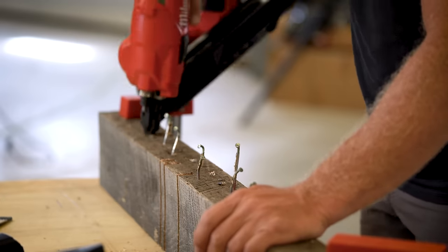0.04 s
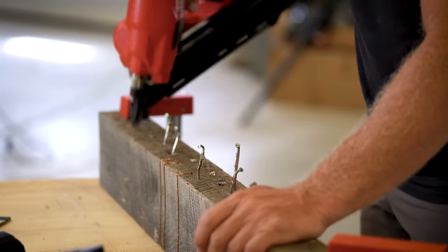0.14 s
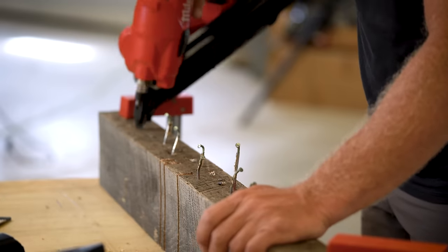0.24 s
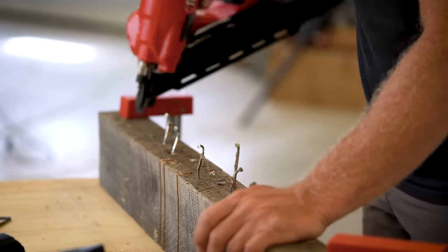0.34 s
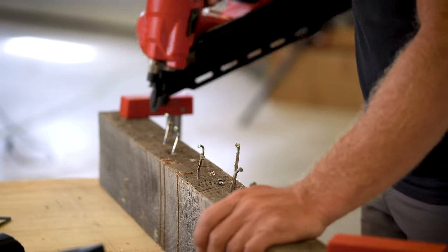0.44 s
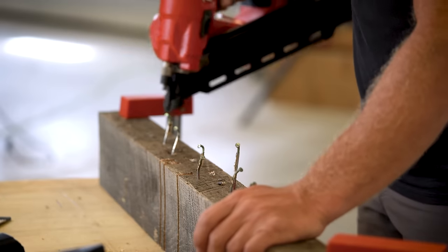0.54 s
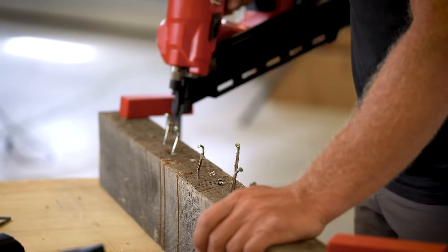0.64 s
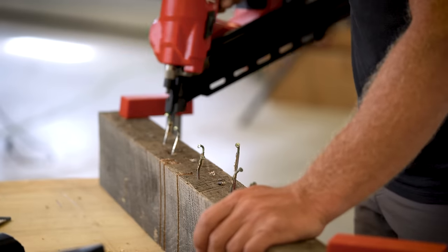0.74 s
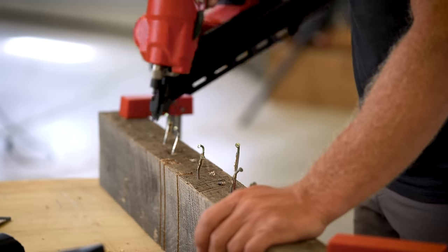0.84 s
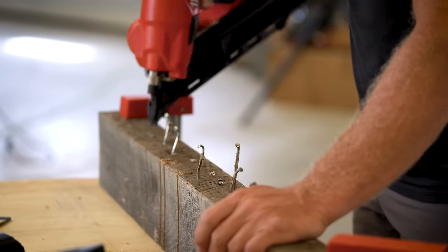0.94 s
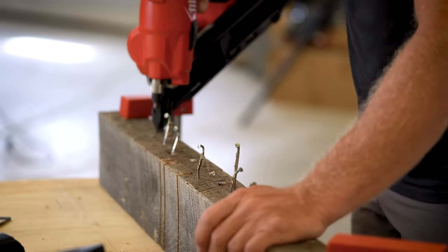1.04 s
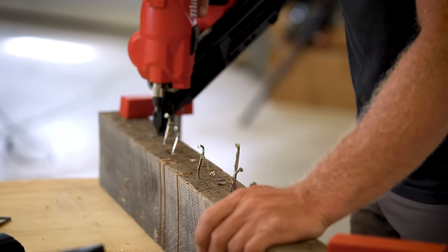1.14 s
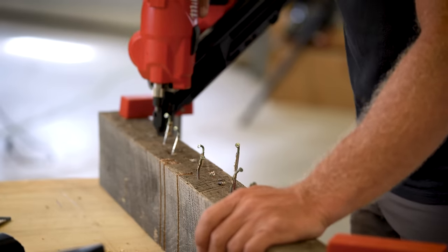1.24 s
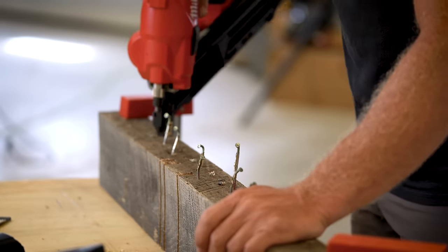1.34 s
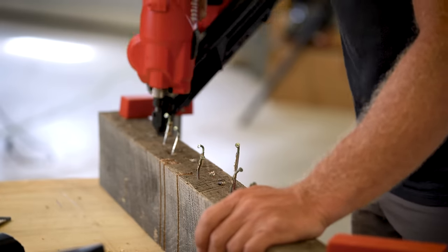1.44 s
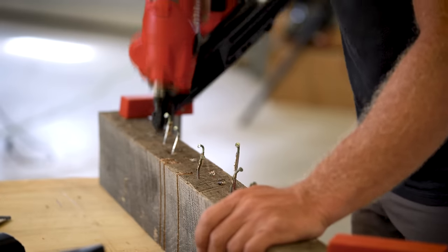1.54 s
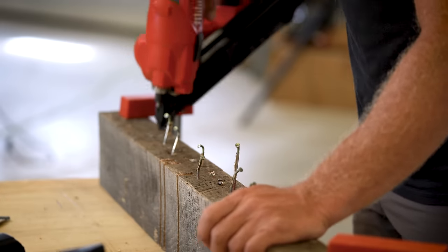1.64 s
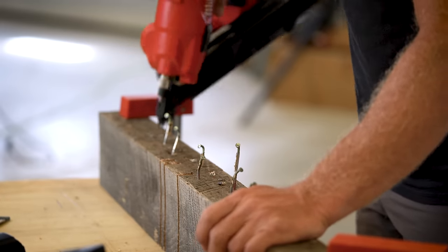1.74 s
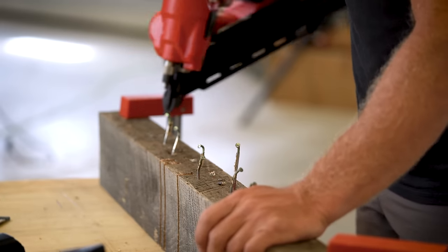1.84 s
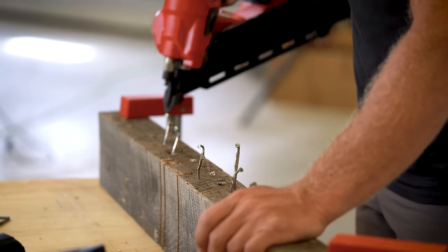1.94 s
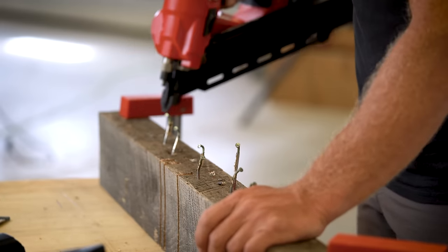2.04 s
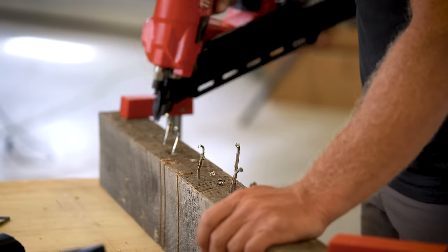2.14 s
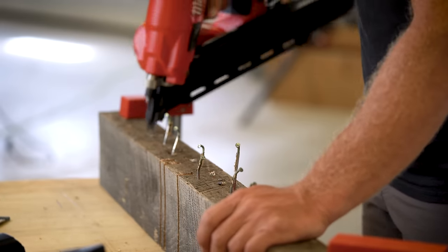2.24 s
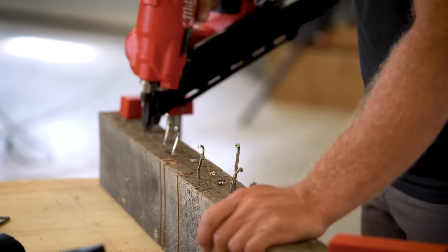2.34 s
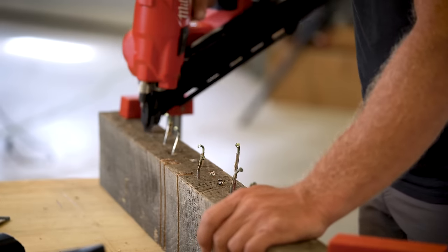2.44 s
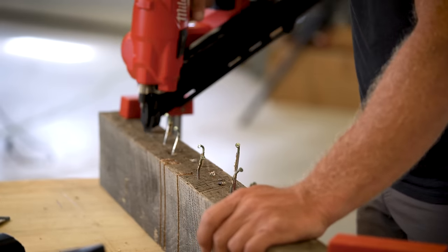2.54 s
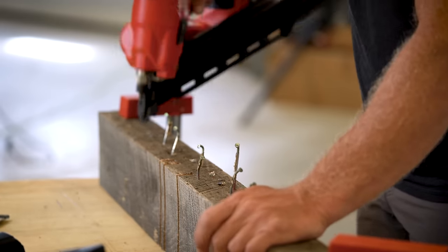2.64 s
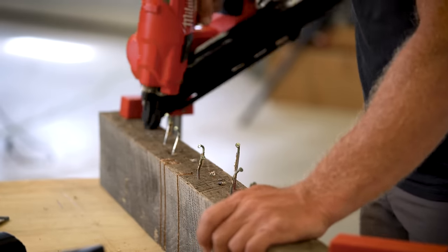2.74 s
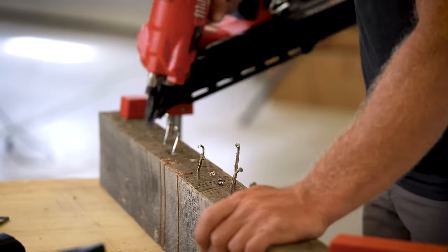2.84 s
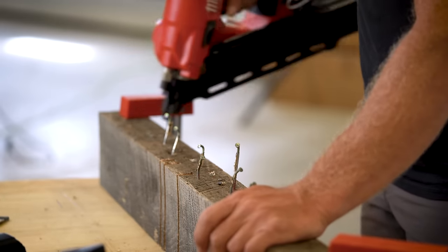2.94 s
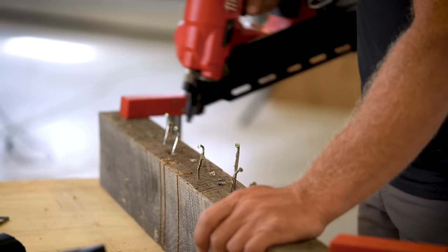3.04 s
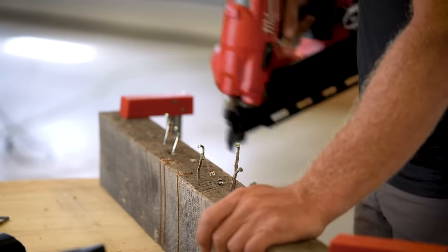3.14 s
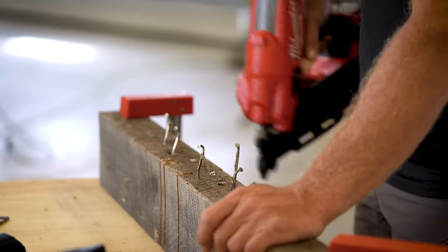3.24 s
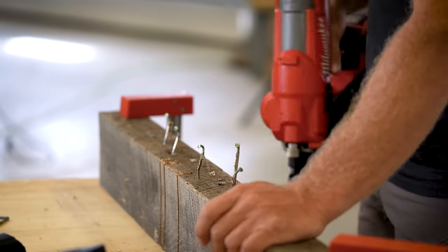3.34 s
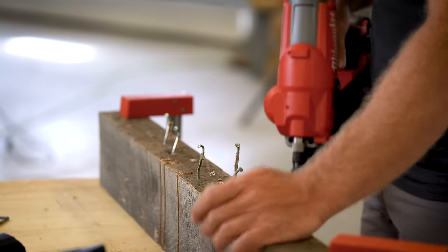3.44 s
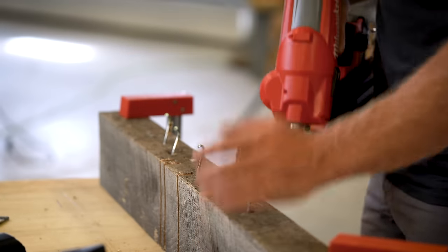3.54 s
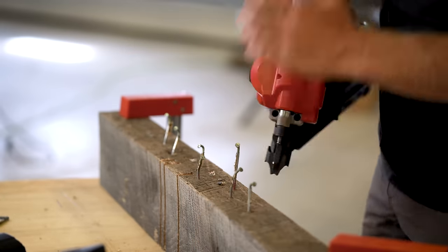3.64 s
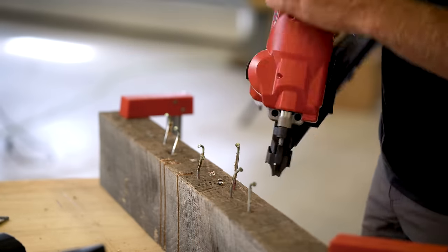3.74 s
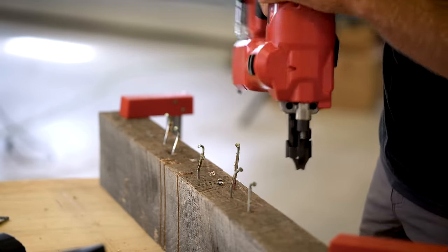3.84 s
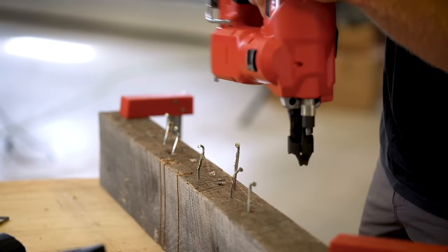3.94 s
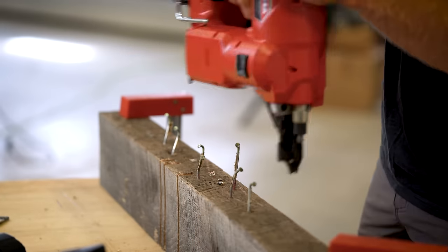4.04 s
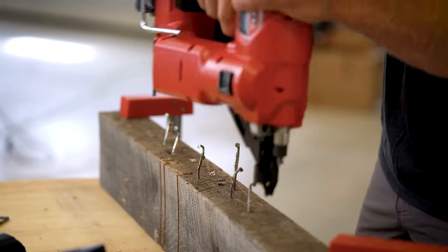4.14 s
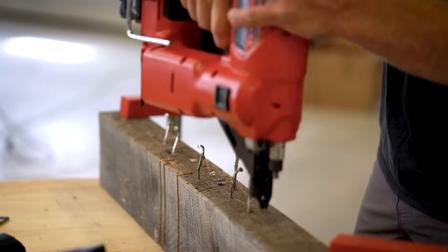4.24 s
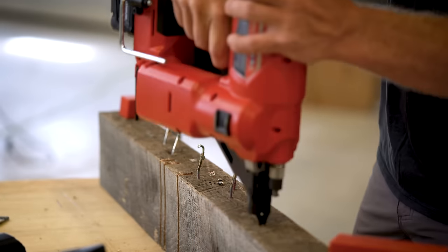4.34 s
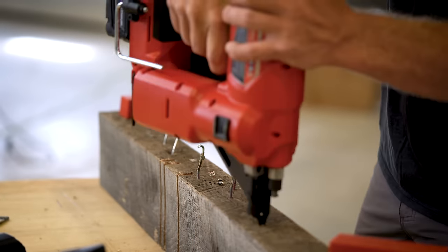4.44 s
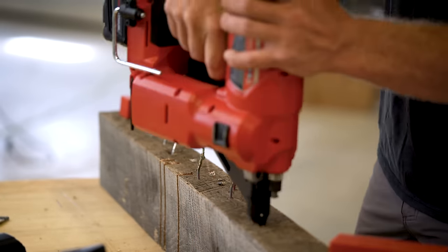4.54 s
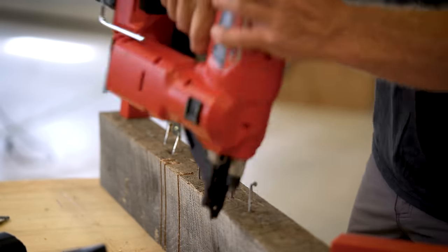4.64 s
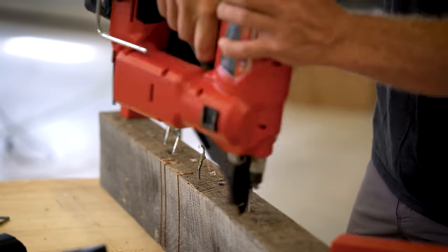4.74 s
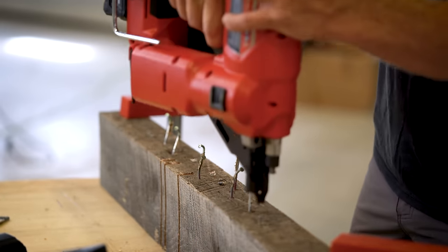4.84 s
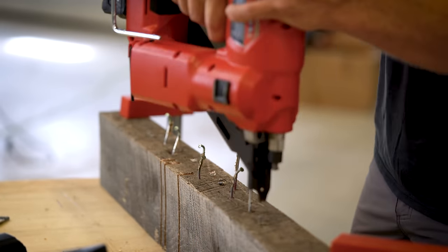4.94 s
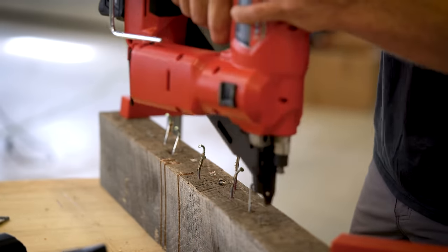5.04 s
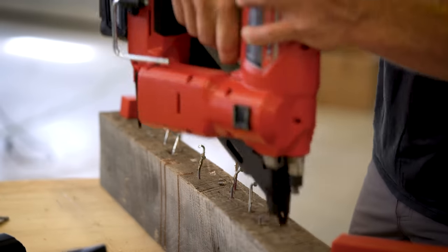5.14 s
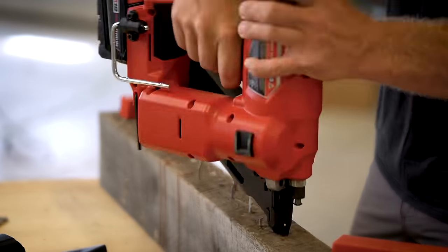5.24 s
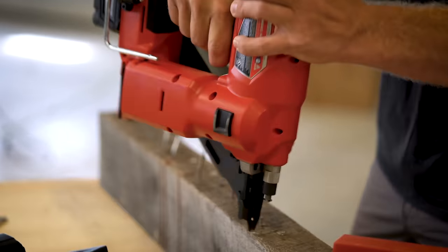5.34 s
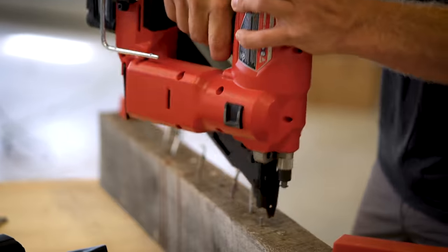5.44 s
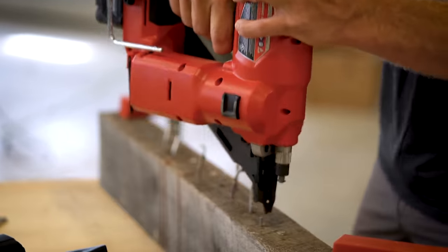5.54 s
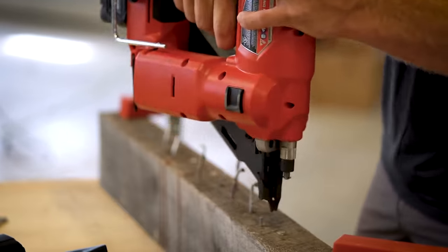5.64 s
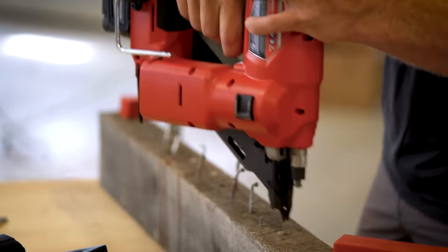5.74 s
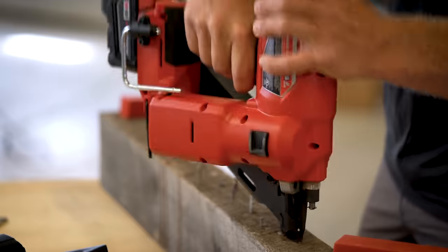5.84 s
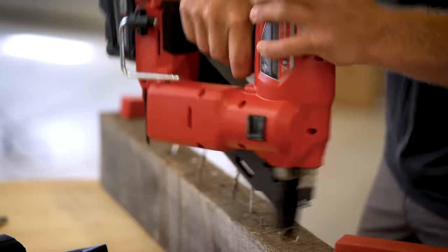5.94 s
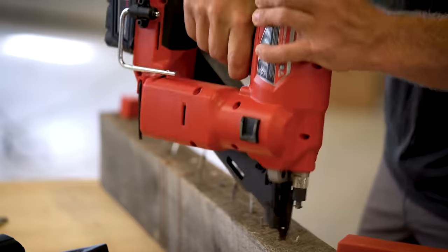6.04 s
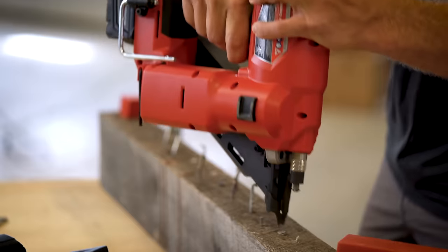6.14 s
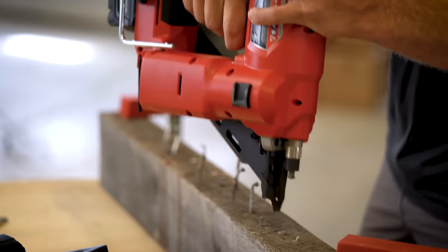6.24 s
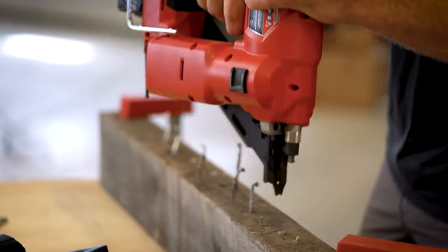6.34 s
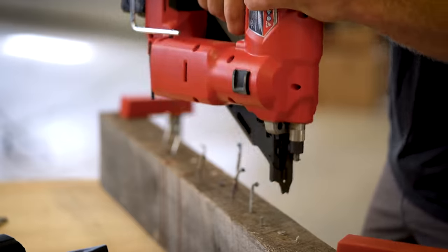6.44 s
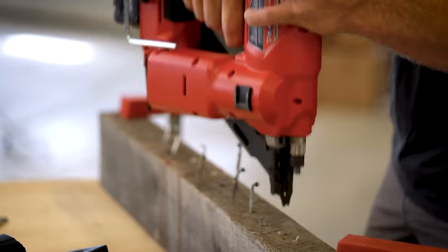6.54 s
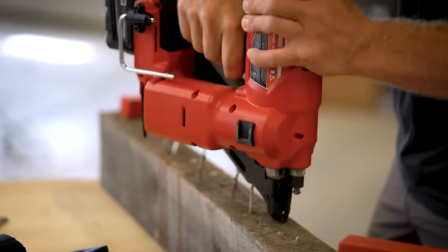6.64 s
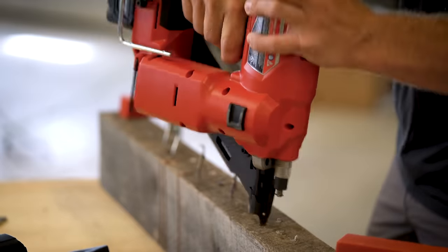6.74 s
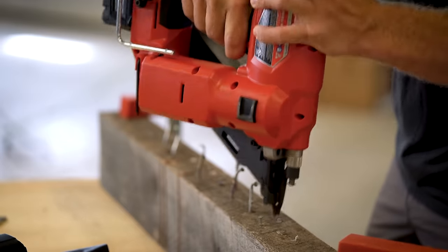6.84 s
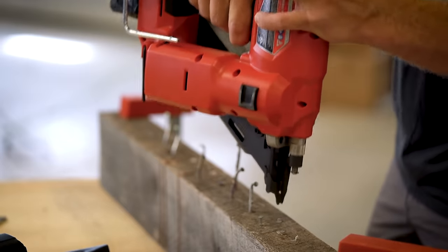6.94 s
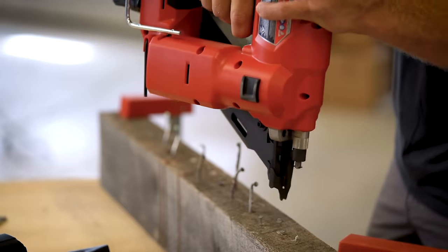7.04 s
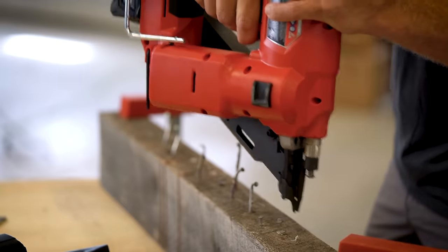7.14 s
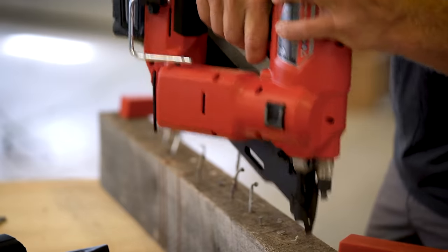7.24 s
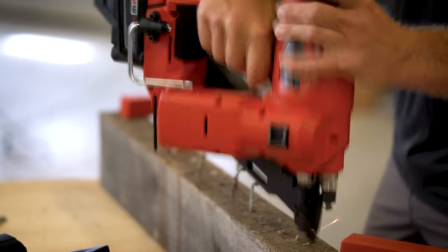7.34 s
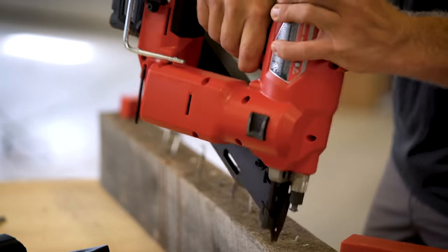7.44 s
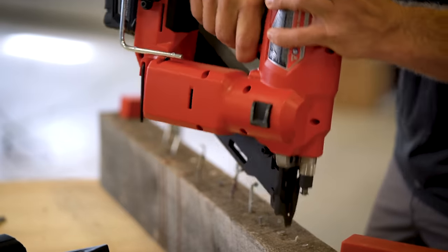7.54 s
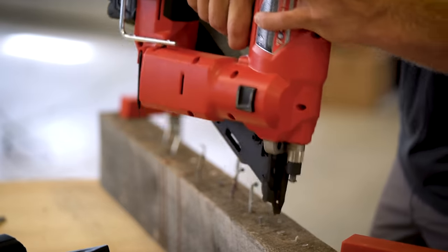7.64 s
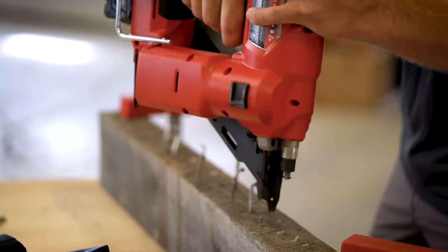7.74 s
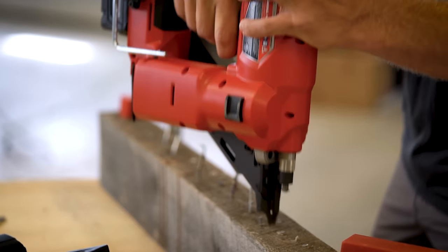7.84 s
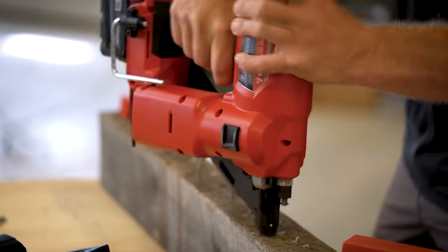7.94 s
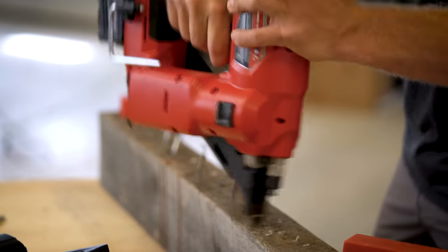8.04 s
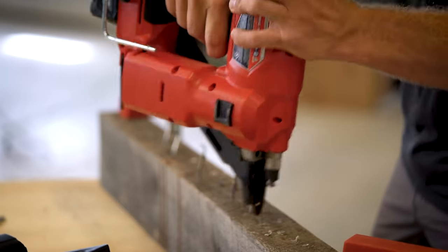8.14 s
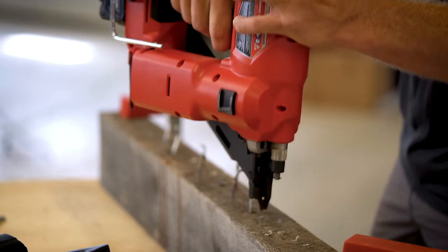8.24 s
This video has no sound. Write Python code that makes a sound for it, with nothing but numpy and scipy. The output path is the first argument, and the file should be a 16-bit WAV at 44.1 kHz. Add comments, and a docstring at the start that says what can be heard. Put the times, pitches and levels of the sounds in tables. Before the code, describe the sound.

Nine nail gun shots crack and thud into dense wood, three spaced apart, then six faster, with clicks and short ratcheting whirs.

```python
"""Cordless nailer in a workshop

A cordless framing nailer drives nine nails into a dense beam clamped to a bench in a large, echoing room.
Each time the nose clicks down, the motor spins up, a steel driver cracks the nail in and the tool bounces.
The geared motor then winds the driver back against a gas spring, tooth by tooth.
The shots are loud enough to overload the microphone."""
import sys
import numpy as np
from scipy import signal
from scipy.io import wavfile

SR = 44100
rng = np.random.default_rng(int(sys.argv[2]) if len(sys.argv) > 2 else 0)


def dump_mix(stems):
    """Bounce the given channels to the path in sys.argv[1] as a 16-bit WAV at rate SR."""
    frames = np.atleast_2d(stems).T  # one column per channel
    limited = np.clip(frames, -1, 1)  # hard clip at full scale
    pcm = np.round(limited * 32767).astype(np.int16)
    wavfile.write(sys.argv[1], SR, pcm)


N = 366030
TIME = np.arange(N) / SR
EDGES_HZ = np.geomspace(22, 17500, 33)
BANDS_HZ = np.sqrt(EDGES_HZ[1:] * EDGES_HZ[:-1])


def from_db(db):
    """Turn decibels into a gain."""
    return 10 ** (np.asarray(db) / 20)

def fade_per_sample(fade_s):
    """The gain per sample that makes a sound fall by 60 dB in fade_s."""
    return from_db(-60 / (fade_s * SR))

def at_hz(table, hz):
    """Look up a table's value at any pitch."""
    known_hz, values = np.transpose(table)
    return np.interp(np.log(hz), np.log(known_hz), values)

def band_pass(sound, band):
    """Keep one band of a sound, about a third of an octave wide."""
    sos = signal.butter(2, EDGES_HZ[band:band + 2], "band", fs=SR, output="sos")
    return signal.sosfilt(sos, sound)

def noise_bands():
    """Equally strong bands of noise, from bass to treble."""
    white = rng.standard_normal((2, N))
    bands = (band_pass(white[k % 2], k) for k in range(len(BANDS_HZ)))
    return np.array([band / band.std() for band in bands], dtype=np.float32)

def band_gains(colour):
    """Turn a tone colour (level per hertz at each pitch) into band gains with a total power of 1."""
    gains = from_db(at_hz(colour, BANDS_HZ)) * np.sqrt(np.diff(EDGES_HZ))
    return (gains / np.linalg.norm(gains)).astype(np.float32)

def flutter(per_s):
    """A random wobble, roughly 1 in size."""
    points = rng.standard_normal(N // 10)
    return np.interp(TIME * per_s, np.arange(len(points)), points)

def impulses(times_s, levels_db):
    """One click for each contact."""
    out = np.zeros(N)
    at = np.round(np.asarray(times_s) * SR).astype(int)
    np.add.at(out, at[at < N], from_db(levels_db)[at < N])
    return out

def strike(noise, clicks, colour, fade_s, contact_s):
    """A knock with no clear note: energy builds during the contact, then dies away."""
    contact = np.clip(contact_s * SR - np.arange(SR // 40), 0, 1)
    energy = signal.oaconvolve(clicks ** 2, contact / contact.sum())[:N].clip(1e-18)
    def envelope(seconds):
        return np.sqrt(signal.lfilter([1], [1, -fade_per_sample(seconds) ** 2], energy))
    gains = band_gains(colour)
    if np.ndim(fade_s) == 0:
        return (gains @ noise) * envelope(fade_s)
    return sum(gain * band * envelope(seconds) for gain, band, seconds in zip(gains, noise, fade_s))

def ring(notes, times_s, levels_db, scatter_db):
    """Every blow sets an object's own notes ringing, each with a slightly random strength."""
    out = np.zeros(N)
    for k, (hz, note_db, fade_s) in enumerate(notes):
        keep, angle = fade_per_sample(fade_s), 2 * np.pi * hz / SR
        clicks = impulses(times_s, levels_db + note_db + scatter_db * rng.standard_normal(len(times_s)))
        feedback = [1, -2 * keep * np.cos(angle), keep ** 2]
        out += (-1) ** k * signal.lfilter([0, np.sin(angle)], feedback, clicks + 1e-18)
    return out


# Tone colour of the background: pitch_hz, level_db
BACKGROUND_COLOUR = [(15, -29), (25, 4), (59, 2), (103, -7), (344, -7.5), (2020, -28), (5280, -30.5),
                     (13800, -33.5), (15000, -43.5)]

def background(noise, level_db=-69.5):
    """A faint, steady rumble fills the room."""
    return from_db(level_db) * (band_gains(BACKGROUND_COLOUR) @ noise)

# Tone colours of struck steel and of the plastic housing: pitch_hz, level_db
STEEL_COLOUR = [(200, -9), (1000, -5), (2500, -3), (3300, -5), (4200, 2), (5200, 1), (6300, -0.5),
                (7600, -3), (10000, -1), (12500, -10.5), (15500, -12.5)]
HOUSING_COLOUR = [(60, -17), (250, -10.5), (550, -7), (800, -1.5), (1100, -3), (1550, 3.5), (2000, -9),
                  (2600, -5.5), (3500, -12), (8000, -20.5), (15500, -29.5)]
# Notes of the tool's shell and nail magazine: pitch_hz, level_db, fade_s
SHELL_NOTES = [(770, -8, .04), (1200, -6, .04), (1500, -6, .04), (1732, -8, .045), (2490, -9, .035),
               (4970, -11, .03)]

def small_parts(steel, wood, contacts):
    """Small steel parts snap home and knock on the plastic housing, which rings briefly."""
    start_s, steel_db, housing_db = np.transpose(contacts)
    snap = strike(steel, impulses(start_s, steel_db + 3.3), STEEL_COLOUR, fade_s=.025, contact_s=.0022)
    knocks = impulses(start_s, housing_db - 2.5)
    housing = strike(wood, knocks, HOUSING_COLOUR, fade_s=.055, contact_s=.002)
    return snap + housing + ring(SHELL_NOTES, start_s, housing_db - 1, scatter_db=2)

# The nose is set on the wood: start_s, steel_db, housing_db
NOSE_TOUCHES = [(.027, -24, -25), (1.1095, -37.5, -28.5), (1.133, -38, -28.5), (2.3181, -34, -25.5),
                (4.4065, -25, -29), (5.2432, -24, -25), (5.882, -26, -24), (6.6424, -22.5, -21),
                (7.3268, -23.5, -28), (7.961, -23, -24)]
# The nose is pressed home, which starts the motor: start_s, steel_db, housing_db, bump_db
NOSE_PRESSES = [(.061, -21, -27, -32), (1.5068, -23.5, -28, -30.5), (2.6205, -23, -28.5, -30.5),
                (4.551, -18, -33, -37), (5.2647, -16.5, -23, -23), (5.903, -18, -29, -21),
                (6.6605, -14.5, -18, -23.5), (7.343, -16, -21, -18), (7.9802, -15.5, -19, -24)]

def nose_clicks(steel, wood):
    """The springy nose clicks twice at every touch and every press."""
    def twice(rows, gap_s, change_db):
        first = np.array(rows)[:, :3]
        return np.vstack([first, first + [gap_s, change_db, change_db]])
    touches = twice(NOSE_TOUCHES, gap_s=.005, change_db=-4.5)
    presses = twice(NOSE_PRESSES, gap_s=.0085, change_db=-1.5)
    return small_parts(steel, wood, np.vstack([touches, presses]))

# Tone colour of the nose bumping the beam: pitch_hz, level_db
BUMP_COLOUR = [(40, -14), (100, -2), (155, 2), (260, -6), (700, -9), (2000, -28), (15000, -58.5)]

def nose_bumps(wood, travel_s=.003):
    """Pushed all the way in, the nose meets the beam with a dull bump."""
    start_s, *_, bump_db = np.transpose(NOSE_PRESSES)
    return strike(wood, impulses(start_s + travel_s, bump_db), BUMP_COLOUR, fade_s=.19, contact_s=.013)

# Timing of a normal rewind: load and brake come on after the shot, then the shaft runs down
LOAD_S, BRAKE_S, RUN_DOWN_S = .04, .289, .014

def rewind_stretches(first=.989, per_shot=.0027):
    """Each rewind's length as a share of normal; it grows as the battery tires."""
    return first + per_shot * np.arange(len(SHOTS))

def motor_run(after_s, lead_s, start_hz=90, free_hz=290, loaded_hz=256, full_load_hz=220):
    """Shaft speed and three sound levels for one normal run: start, take the load, brake."""
    settle_s, sag_hz_per_s, stop_db = .022, 218, -16
    starting = np.clip(-after_s / lead_s, 0, 1)
    loaded_s = np.maximum(after_s - LOAD_S, 0)
    settling_hz = (free_hz - loaded_hz) * np.exp(-loaded_s / settle_s)
    running_hz = loaded_hz + settling_hz - sag_hz_per_s * loaded_s
    load = np.clip((free_hz - running_hz) / (free_hz - full_load_hz), 0, 1)
    braking = np.exp(-((after_s - BRAKE_S) / RUN_DOWN_S) ** 2)
    stopping = np.clip((after_s - BRAKE_S) / RUN_DOWN_S, 0, 1)
    shaft_hz = (running_hz - (free_hz - start_hz) * starting) * (1 - .5 * stopping ** 2)
    def level(free_db, start_db, load_db, brake_db):
        return free_db + start_db * starting + load_db * load + brake_db * braking + stop_db * stopping
    grind_db = level(-25.2, start_db=-15, load_db=-7, brake_db=6)
    motor_db = level(-39, start_db=-26, load_db=5, brake_db=5)
    lifter_db = level(-49.5, start_db=-10, load_db=23.5, brake_db=-2)
    return shaft_hz, grind_db, motor_db, lifter_db

# How well the gearbox gives off each pitch: pitch_hz, level_db
GEARBOX_RESPONSE = [(500, -8), (900, -0.5), (1600, -5.5), (2450, 0), (3000, -2.5), (3500, -1.5), (4100, -5),
                    (4500, 0.5), (5050, 2), (5500, -9), (7500, -7), (10000, -14)]

def gear_whine(tones, shaft_hz, turns, rough_db):
    """Slack between the teeth makes gear tones flutter; they swell at pitches the gearbox favours."""
    out, on = np.zeros(N), shaft_hz > 0
    for per_turn, tone_db in tones:
        level_db = tone_db + at_hz(GEARBOX_RESPONSE, per_turn * shaft_hz[on])
        level_db += rough_db * flutter(170)[on]
        slack = .7 * flutter(450)[on]
        out[on] += from_db(level_db) * np.sin(2 * np.pi * per_turn * turns[on] + slack)
    return out

# Gear tones of the motor and of the lifter, which winds the driver back: cycles_per_turn, level_db
MOTOR_TONES = [(3, -6.5), (5, -6), (10, -11.5), (12, -3)]
LIFTER_TONES = [(20, -1), (24, -3), (36, -10)]
# Tone colour of grinding gears: pitch_hz, level_db
GRIND_COLOUR = [(40, -18), (90, -8.5), (140, 2), (400, 4.5), (750, 4.5), (1200, 3.5), (2000, -4.5),
                (2550, 1), (3300, -11), (4800, -5.5), (8000, -22.5), (10000, -20.5), (12500, -19),
                (15500, -20.5)]

def motor(noise, tremble=.0055, spin_up_db=11, hidden_share=.35, grit_db=2.5):
    """The geared motor races up to the shot, then slows under the load of the spring and stops."""
    shaft_hz, grind_gain, motor_gain, lifter_gain = np.zeros((4, N))
    for (shot_s, *_, facing_db), (press_s, *_), stretch in zip(SHOTS, NOSE_PRESSES, rewind_stretches()):
        on = (TIME > press_s) & (TIME < shot_s + (BRAKE_S + RUN_DOWN_S) * stretch)
        hz, grind_db, motor_db, lifter_db = motor_run((TIME[on] - shot_s) / stretch, shot_s - press_s)
        shaft_hz[on] = hz / stretch
        motor_db += spin_up_db * (TIME[on] < shot_s)
        motor_db -= hidden_share * facing_db   # facing the microphone, the lifter hides the motor
        grind_gain[on], motor_gain[on] = from_db([grind_db, motor_db])
        lifter_gain[on] = from_db(lifter_db + facing_db)
    turns = np.cumsum(shaft_hz * (1 + tremble * flutter(400))) / SR   # uneven load shakes the speed
    whine = motor_gain * gear_whine(MOTOR_TONES, shaft_hz, turns, rough_db=4.8)
    whine += lifter_gain * gear_whine(LIFTER_TONES, shaft_hz, turns, rough_db=4)
    grind = grind_gain * (band_gains(GRIND_COLOUR) @ noise)
    return whine + grind * from_db(grit_db * flutter(1100))

# The nine shots: start_s, crack_db, thud_db, beam_db, bench_db, facing_db
# (facing_db is higher the more openly the lifter faces the microphone)
SHOTS = [(0.1199, 0, -3, -3, -1, -8.5), (1.5643, 2.5, -2.5, -5.5, -2, -11),
         (2.6705, 0.5, -1.5, -3.5, -2.5, -11.5), (4.6039, 1, -4, -2, -11.5, -5),
         (5.3241, 1.5, -5, 1, -10, -3), (5.9656, 3, -2.5, 0, -8.5, -4), (6.723, 1.5, -2, -0.5, -11.5, -3),
         (7.405, 1.5, -2, 3, -8.5, -2.5), (8.0418, 1.5, -3, 0.5, -9, -2)]
# Tone colours of the driver's crack and the wood's thud: pitch_hz, level_db
CRACK_COLOUR = [(60, 12), (160, 10), (400, 4.5), (800, 10), (1300, 11), (2100, -1.5), (3200, -2.5),
                (4500, 2), (7000, 1.5), (10000, -0.7), (15500, -9)]
THUD_COLOUR = [(30, -13), (70, -7.5), (160, -1.5), (280, -2.5), (550, 1.5), (850, -3.5), (1400, -2.5),
               (2000, -11.5), (3200, -19.5), (5000, -23.5), (10000, -31.5), (15500, -29)]
# How long the thud lasts: pitch_hz, fade_s
THUD_FADES = [(50, .2), (160, .22), (550, 0.17), (1400, 0.082), (4000, 0.14), (15000, 0.11)]
# Notes of the beam with the tool on it, and of the bench below: pitch_hz, level_db, fade_s
BEAM_NOTES = [(150, -19, 0.084), (227.4, -17.5, 0.18), (339.6, -17, 0.27), (477, -20, .24),
              (536.8, -17, .14), (616, -16.5, 0.19), (1124, -15.5, .09), (1420, -34, .08)]
BENCH_NOTES = [(36, -23, 0.2), (65, -15, 0.31), (97.7, -20, .25), (131, -18, 0.32), (170, -13, 0.21)]

def shots(steel, wood, travel_s=.003, rebound_s=.018):
    """The driver cracks the nail in, thumps the beam and bench, and rebounds against the lifter."""
    start_s, crack_db, thud_db, beam_db, bench_db, facing_db = np.transpose(SHOTS)
    hit_s = start_s + travel_s
    crack = strike(steel, impulses(start_s, crack_db + .3), CRACK_COLOUR, fade_s=.032, contact_s=.0042)
    rebounds = impulses(start_s + rebound_s, facing_db - 14)
    rebound = strike(steel, rebounds, STEEL_COLOUR, fade_s=.04, contact_s=.004)
    fades_s = at_hz(THUD_FADES, BANDS_HZ)
    thud = strike(wood, impulses(hit_s, thud_db - 2), THUD_COLOUR, fades_s, contact_s=.002)
    beam = ring(BEAM_NOTES, hit_s, beam_db, scatter_db=1.3)
    bench = ring(BENCH_NOTES, hit_s, bench_db, scatter_db=1.3)
    return crack + rebound + thud + beam + bench

# After some shots the tool drops back hard on its nose: start_s, steel_db, wood_db, bench_db
HARD_LANDINGS = [(.2217, -20, -19, -16), (1.630, -28, -12, -7), (1.6501, -16, -16, -14),
                 (2.7426, -15, -12.5, -9), (6.0188, -16.5, -18, -22), (6.7732, -12.5, -16, -20)]

def bounces(steel, wood, recoil_s=.0463, chatter_s=.0095, loss_db=3):
    """The kick of each shot knocks the tool once more; a hard landing chatters three times."""
    recoils = [(shot_s + recoil_s, -24, -14.5, bench_db - 7) for shot_s, *_, bench_db, _ in SHOTS]
    chatter = [(land_s + k * chatter_s, steel_db - k * loss_db, wood_db, bench_db)
               for land_s, steel_db, wood_db, bench_db in HARD_LANDINGS for k in range(3)]
    start_s, steel_db, wood_db, bench_db = np.transpose(recoils + chatter)
    clink = strike(steel, impulses(start_s, steel_db + 2), STEEL_COLOUR, fade_s=.036, contact_s=.00068)
    thud = strike(wood, impulses(start_s, wood_db - 4), THUD_COLOUR, fade_s=.076, contact_s=.003)
    beam = ring(BEAM_NOTES, start_s, wood_db + 2.5, scatter_db=1.5)
    bench = ring(BENCH_NOTES, start_s, bench_db, scatter_db=.5)
    return clink + thud + beam + bench

# Tone colour of a lifter pin hitting a tooth: pitch_hz, level_db
PIN_COLOUR = [(400, -11), (1500, -4), (3400, -9.5), (4200, -0.5), (4900, 2), (5800, -2.5), (7300, -3.5),
              (8500, -9.5), (10000, -5.5), (12500, -13), (15500, -16.5)]

def lifter_teeth(steel, pickup_s=.076, first_tooth_s=.1228, gap_s=.035, slowing=.045, count=5):
    """The lifter picks up the driver and catches tooth after tooth, slowing as the spring tightens."""
    gaps_s = gap_s * (1 + slowing) ** np.arange(count)
    catches_s = first_tooth_s + np.cumsum(gaps_s) - gaps_s
    releases_s = catches_s + .42 * gaps_s   # each pin slips off again with a lighter click
    after_s = np.r_[pickup_s, catches_s, releases_s]
    levels_db = np.r_[-19, np.full(count, -15.2), np.full(count, -25)]
    clicks = sum(impulses(shot_s + stretch * after_s, levels_db + .4 * facing_db)
                 for (shot_s, *_, facing_db), stretch in zip(SHOTS, rewind_stretches()))
    return strike(steel, clicks, PIN_COLOUR, fade_s=.019, contact_s=.001)

# Light ticks of the nail strip: start_s, level_db
STRIP_TICKS = [(1.1897, -42), (1.215, -44), (1.271, -41), (2.3405, -37), (4.051, -52), (4.0736, -44.5),
               (4.1124, -50), (4.135, -44), (4.3276, -53), (5.6114, -28), (7.8975, -33)]

def nail_strip(steel, wood):
    """The nails tick in their magazine as the tool is moved, more plastic knock than steel."""
    return small_parts(steel, wood, [(start_s, db - 9.5, db) for start_s, db in STRIP_TICKS])

# A scrape of the nose, then a rustle of the tool: peak_s, level_db, rise_db_per_s, fall_db_per_s
HANDLING_RUSTLES = [(1.5, -54, 270, 600), (3.94, -62, 55, 150)]
# Tone colour of the scrape and rustle: pitch_hz, level_db
RUSTLE_COLOUR = [(60, -5.5), (150, 2), (400, -2), (1500, 0), (3500, -5.5), (7000, -9.5), (15500, -23)]

def handling(noise, rough_db=3.5):
    """The nose scrapes and the tool rustles as it is moved, in short, uneven swells."""
    swells_db = [db - np.maximum(rise * (peak_s - TIME), fall * (TIME - peak_s))
                 for peak_s, db, rise, fall in HANDLING_RUSTLES]
    level_db = np.max(swells_db, axis=0) + rough_db * flutter(120)
    return from_db(level_db) * (band_gains(RUSTLE_COLOUR) @ noise)

def turn_sideways(sound, turn_s=(3.5, 4.3), shade=.22, cutoff_hz=11500):
    """Once the tool is turned side-on, its housing blocks a little of the highest treble."""
    dull = signal.sosfilt(signal.butter(2, cutoff_hz, fs=SR, output="sos"), sound)
    side_on = np.interp(TIME, turn_s, [0, 1])
    return sound + shade * side_on * (dull - sound)

# Tone colour of the metal clack: pitch_hz, level_db
CLACK_COLOUR = [(200, -18), (900, -8.5), (1600, -8.5), (2000, -15), (2450, 3), (3000, -10.5), (3600, 0),
                (4400, 1.5), (5200, -9), (6500, -3.5), (10000, -10.5), (15500, -14)]

def clack(steel, start_s=5.5867, level_db=-1):
    """One loud metal clack, likely the nose springing free."""
    return strike(steel, impulses([start_s], [level_db]), CLACK_COLOUR, fade_s=.032, contact_s=.002)

# Strength of the room's echo: pitch_hz, level_db
ECHO_LEVELS = [(40, -14.5), (100, -6), (230, -1), (500, 0.5), (1000, -0.5), (1350, 0.5), (1700, 3.5),
               (2050, -0.5), (2700, 0.5), (3600, -1.5), (5200, -4), (8000, -3.5), (15500, -9.5)]
# How long the echo lasts: pitch_hz, fade_s
ECHO_FADES = [(60, .7), (200, 1.19), (600, 1.414), (1700, 1.704), (3000, 1.63), (5000, 1.35), (8000, 0.82),
              (15000, 0.54)]
# Narrow peaks that stand out of the echo: pitch_hz, width_hz, level_db
ECHO_PEAKS = [(1710, 67, -5.5), (2600, 220, -7.5)]

def workshop_echo(sound, noise, echo_db=-10.7, build_s=.019):
    """The room fills with sound and lets it die away; the middle pitches last longest."""
    echo, fill = np.zeros(N), np.exp(-1 / (build_s * SR))
    for k, hz in enumerate(BANDS_HZ):
        keep = fade_per_sample(at_hz(ECHO_FADES, hz)) ** 2
        power = band_pass(sound, k) ** 2
        energy = signal.lfilter([10 * (1 - fill) / SR], [1, -keep - fill, keep * fill], power)
        echo += from_db(echo_db + at_hz(ECHO_LEVELS, hz)) * noise[k] * np.sqrt(np.abs(energy))
    return echo + sum(from_db(db) * signal.lfilter(*signal.iirpeak(hz, hz / width_hz, fs=SR), echo)
                      for hz, width_hz, db in ECHO_PEAKS)

def scene(rattle_db=1.5, clicks_to_room_db=-4):
    """The nailer, its handling and the room around it."""
    wood = noise_bands()
    # shifted copies give each kind of sound its own noise
    steel, air, room = (np.roll(wood, k * N // 4, axis=1) for k in range(1, 4))
    steel = steel * from_db(rattle_db * flutter(1600)).astype(np.float32)   # a rattle of tiny impacts
    tool = nose_bumps(wood) + shots(steel, wood) + bounces(steel, wood)
    tool += lifter_teeth(steel) + motor(air)
    clicks = nose_clicks(steel, wood) + nail_strip(steel, wood) + clack(steel)
    rustle = handling(air)
    # the small parts sit close to the microphone and stir the room less
    echo = workshop_echo(tool + from_db(clicks_to_room_db) * clicks + rustle, room)
    return (turn_sideways(tool + clicks) + echo + rustle + background(wood))[None]

def record(dry, cutoff_hz=15850):
    """The shots overload the microphone, which flattens their peaks; the top treble is cut."""
    flattened = np.clip(dry, -1, 1)
    return signal.sosfilt(signal.ellip(10, .1, 70, cutoff_hz, fs=SR, output="sos"), flattened)


dry = scene()
out = record(dry)
dump_mix(out)
```